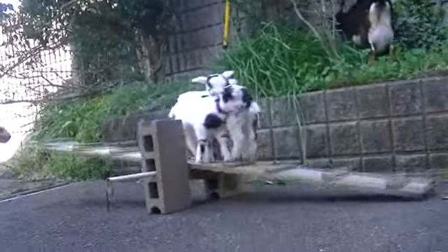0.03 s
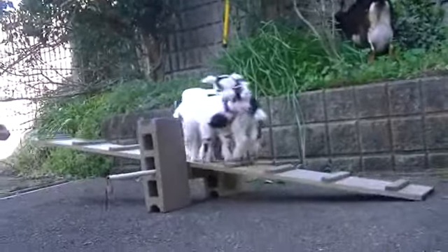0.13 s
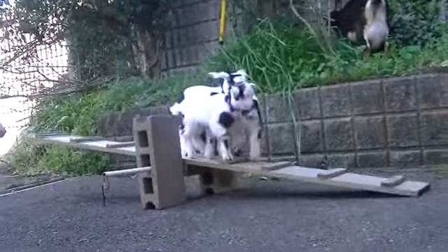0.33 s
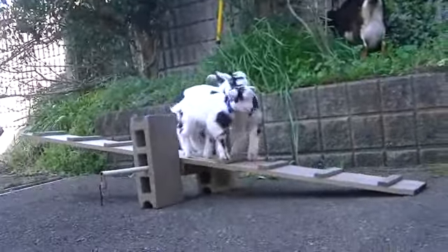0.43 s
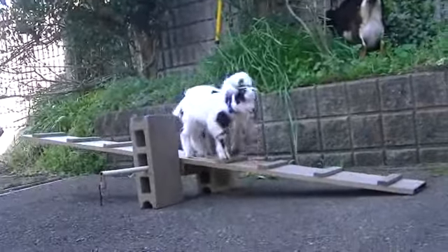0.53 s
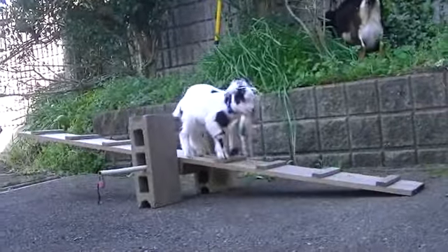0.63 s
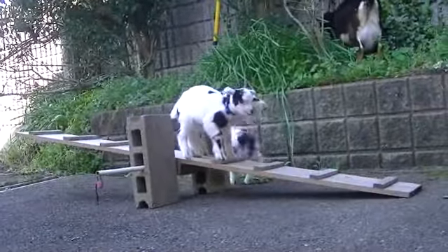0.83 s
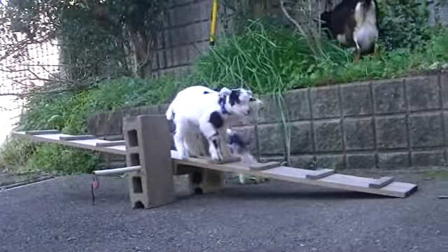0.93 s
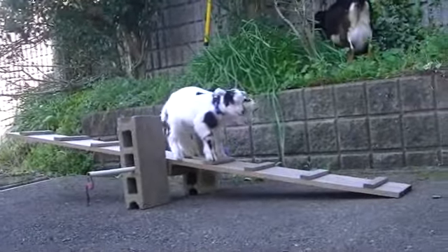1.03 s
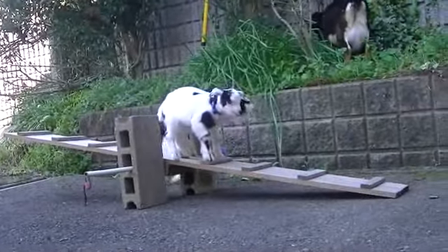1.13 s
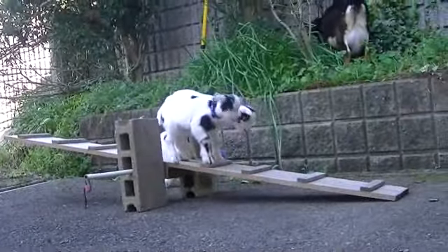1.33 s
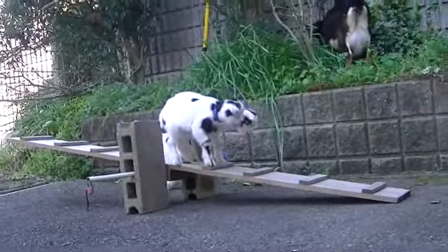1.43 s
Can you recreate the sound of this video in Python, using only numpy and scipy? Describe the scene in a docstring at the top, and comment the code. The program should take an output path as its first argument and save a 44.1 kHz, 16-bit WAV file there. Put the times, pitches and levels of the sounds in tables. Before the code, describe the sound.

A wooden plank seesaw slams onto asphalt at about 0.2 seconds with a loud, briefly ringing clack, rattles, and lands again more softly near 0.6 seconds. Young goats' hooves tick and scuff on the boards through the first second, echoing slightly off the yard's walls. Around 1.1 seconds a few dry bumps sound close on the microphone, fading by 1.4. A faint high whine pulses over quiet outdoor air.

```python
"""A walled yard, where young goats tip a plank seesaw: its end slams on the asphalt, rebounds and
lands again, each contact a woody clack with a short ring. Hooves knock, tick and scuff on the
boards, and the walls answer. Close by, the camera's case takes a few dry bumps, and a faint high
whine pulses over the quiet outdoor air."""
import sys
import numpy as np
from scipy import signal
from scipy.fft import rfft, irfft, next_fast_len
from scipy.io import wavfile
from scipy.ndimage import uniform_filter1d

SR = 44100
rng = np.random.default_rng(int(sys.argv[2]) if len(sys.argv) > 2 else 0)


def store_wav(level_fs):
    """Save 16-bit WAV to argv[1]."""
    pcm = np.round(np.clip(np.atleast_2d(level_fs), -1, 1) * 32767)
    wavfile.write(sys.argv[1], SR, pcm.T.astype(np.int16))


N = 66150

# Stereo width of diffuse sound: frequency_hz, side_over_mid_db
DIFFUSE_WIDTH = [(100, 0.5), (300, -6.5), (600, -3.5), (1200, 0), (2800, -0.5), (3600, 3), (5000, -40.5)]
# Reverb time of the yard: frequency_hz, t60_s
YARD_DECAY = [(150, 0.84), (700, 0.6), (2000, 0.45), (5000, 0.53), (11000, 0.3)]
# Tone colour of the outdoor air: frequency_hz, relative_db
AIR_SPECTRUM = [(18, -39), (30, -28), (187, -2), (665, -1.5), (1160, -2), (1430, -2.5), (1790, -4.5),
                (2760, -9), (4590, -14), (11200, -23.5), (13000, -30)]
# The whine's two tones: pitch_hz, level_db
WHINE_TONES = [(2720, -61.5), (2799, -72.5)]
# Bumps on the camera's case: start_s, level_db, lowpass_hz
CASE_BUMPS = [(0.018, -40, 303), (1.084, -27.5, 3000), (1.094, -27.5, 5060), (1.097, -25, 3000),
              (1.109, -32.5, 900), (1.134, -41.5, 3970), (1.201, -45.5, 690), (1.276, -45.5, 705),
              (1.286, -43, 600), (1.430, -52, 5000)]
# Tone colour of the case: frequency_hz, relative_db
CASE_SPECTRUM = [(40, -34), (130, -10.5), (300, -17), (520, -7.5), (1000, -1.5), (1350, -21.5), (1950, -3),
                 (2250, -12.5), (3600, -7), (5000, -15.5), (11000, -11.5)]
# Stereo width of the bumps: frequency_hz, side_over_mid_db
CASE_WIDTH = [(100, 6), (500, 12), (1000, 7), (2000, 1), (3500, -26.5)]
# Sharp ticks of hoof and grit: start_s, level_db
HOOF_TICKS = [(0.021, -40.5), (0.117, -43.5), (0.124, -55), (0.2008, -27.5), (0.275, -43.5), (0.360, -34),
              (0.370, -27.5), (0.373, -37), (0.47, -43), (0.478, -40), (0.5673, -27), (0.579, -30),
              (0.667, -42.5), (0.7482, -31), (0.81, -45), (0.838, -40.5), (0.901, -56), (1.001, -52)]
# Hooves sliding on the board: peak_s, level_db, half_length_s
HOOF_SCUFFS = [(0.005, -50.5, 0.019), (0.127, -55, 0.026), (0.37, -35, 0.015), (0.331, -50.5, .025),
               (0.495, -51, 0.039), (0.584, -42.5, 0.016), (0.75, -56, 0.056), (0.98, -57, 0.0084)]
# Tone colour of ticks and scuffs: frequency_hz, relative_db
GRIT_SPECTRUM = [(300, -27), (1500, 2), (3000, 1), (5000, -6), (8000, -3.5), (11000, -2), (13000, -14)]
# The plank meeting the ground or a hoof: start_s, level_db, lowpass_hz
PLANK_HITS = [(0.000, -35.5, 940), (0.018, -41.5, 3520), (0.203, -8, 1800), (0.214, -11, 1660),
              (0.23, -21, 1500), (0.275, -20.5, 4540), (0.296, -18.5, 3230), (0.324, -35, 4000),
              (0.412, -34.5, 1000), (0.437, -31.5, 2200), (0.497, -30.5, 2574), (0.574, -14.5, 1350),
              (0.602, -19, 1330), (0.749, -39, 1990), (0.810, -33, 3250), (0.835, -39, 1100),
              (0.974, -44.5, 1300), (1.370, -69, 1400)]
# The plank's ringing modes: pitch_hz, relative_db
PLANK_RING = [(532.9, -43), (635.2, -51.5), (716.0, -42), (748.3, -46.5), (877.5, -50.5), (920.5, -44.5),
              (1023, -40), (1168, -53.5), (1297, -46), (1410, -42), (1486, -46), (1825, -54), (1890, -52.5),
              (1997, -48)]
# Tone colour of the woody clack: frequency_hz, relative_db
WOOD_SPECTRUM = [(60, -54), (150, -36), (250, -17.5), (400, -3), (700, 0), (1400, -2), (1800, -3.5),
                 (2600, -6), (4000, -13.5), (6000, -21), (12000, -18)]

AIR_DB, AIR_WAVER_DB = -56.5, 4.5
WHINE_GAP_AT_S, WHINE_PERIOD_S, WHINE_GAP_S = 1.035, 0.1, 0.025
CASE_ATTACK_S, CASE_T60_S = 0.001, 0.047
TICK_ATTACK_S, TICK_T60_S = 0.0003, 0.025
HIT_ATTACK_S, CLACK_T60_S, CLACK_SIDE_DB = 0.0017, 0.087, -8
RING_DB, RING_T60_S = -7, 0.24
YARD_BUILD_S, HOOF_WET_DB, PLANK_WET_DB = 0.0095, -6.5, -7.5
TOP_HZ = 12800


def amp(db):
    """Decibels to gain."""
    return 10 ** (np.asarray(db) / 20)


def unit_rms(x):
    """Scale to rms 1."""
    return x / np.sqrt(np.mean(x ** 2) + 1e-20)


def curve_at(points, hz):
    """Read a curve of (frequency_hz, value) points on a log frequency axis."""
    point_hz, values = np.transpose(points)
    return np.interp(np.log(hz + 1), np.log(point_hz + 1), values)


def eq(x, response):
    """Filter x with a gain given as a function of frequency."""
    size = next_fast_len(N + SR // 2)
    hz = np.fft.rfftfreq(size, 1 / SR)
    return irfft(rfft(x, size) * response(hz), size)[..., :N]


def lowpass_gain(hz, lowpass_hz):
    """A softer contact loses the treble above its corner."""
    return 1 / np.sqrt(1 + (hz / lowpass_hz) ** 4)


def noise(spectrum, lowpass_hz=SR):
    """Coloured noise of rms 1."""
    white = rng.standard_normal(N)
    return unit_rms(eq(white, lambda hz: amp(curve_at(spectrum, hz)) * lowpass_gain(hz, lowpass_hz)))


def flutter(samples):
    """Random modulation of rms 1, slower when smoothed over more samples."""
    return unit_rms(uniform_filter1d(rng.standard_normal(N), size=samples))


def strike(start_s, attack_s, t60_s):
    """Impact envelope: quick rise, exponential decay."""
    age = np.maximum(np.arange(N) / SR - start_s, 0)
    return (1 - np.exp(-age / attack_s)) * np.exp(-np.log(1000) * age / t60_s)


def spread(mid, side):
    """Left and right of a diffuse sound: wide in the mids, centred in the top end."""
    side = eq(side, lambda hz: amp(curve_at(DIFFUSE_WIDTH, hz)))
    return np.array([mid + side, mid - side])


def yard_reverb(x):
    """The walls' answer builds up, then each frequency dies at its own speed."""
    hz, frame_s, bands = signal.stft(rng.standard_normal((2, SR)), SR, nperseg=256)
    decay = np.exp(-np.log(1000) * frame_s / curve_at(YARD_DECAY, hz)[:, None])
    tail = signal.istft(bands * decay, SR, nperseg=256)[1][:, :SR]
    tail *= 1 - np.exp(-np.arange(SR) / SR / YARD_BUILD_S)
    mid, side = signal.fftconvolve(x[None], tail / np.linalg.norm(tail[0]), axes=1)[:, :N]
    return spread(mid, side)


def outdoor_air():
    """A quiet bed of outdoor noise whose level wavers."""
    level_db = AIR_DB + AIR_WAVER_DB * flutter(samples=3000)
    return amp(level_db) * spread(noise(AIR_SPECTRUM), noise(AIR_SPECTRUM))


def whine():
    """A faint high whine that drops out briefly ten times a second."""
    t = np.arange(N) / SR
    half_period = WHINE_PERIOD_S / 2
    from_gap_s = np.abs((t - WHINE_GAP_AT_S + half_period) % WHINE_PERIOD_S - half_period)
    gate = uniform_filter1d((from_gap_s > WHINE_GAP_S / 2) * 1.0, size=200)  # soft edges
    return gate * sum(amp(db) * np.sqrt(2) * np.sin(2 * np.pi * hz * t) for hz, db in WHINE_TONES)


def case_bumps():
    """Dry knocks through the camera's case push its two microphones in opposite directions."""
    knocks = np.zeros(N)
    for start_s, level_db, lowpass_hz in CASE_BUMPS:
        envelope = strike(start_s, CASE_ATTACK_S, CASE_T60_S)
        knocks += amp(level_db) * envelope * noise(CASE_SPECTRUM, lowpass_hz)
    side = eq(knocks, lambda hz: -1j * amp(curve_at(CASE_WIDTH, hz)))  # a quarter cycle behind
    return np.array([knocks + side, knocks - side])


def hooves():
    """Hoof and grit tick hard on the board and slide in grainy scuffs; the walls answer."""
    t = np.arange(N) / SR
    tick_envelope = sum(amp(db) * strike(start_s, TICK_ATTACK_S, TICK_T60_S) for start_s, db in HOOF_TICKS)
    ticks = tick_envelope * noise(GRIT_SPECTRUM)
    grain = amp(3.1 * flutter(samples=70))
    swells = sum(amp(db) * np.exp(-((t - peak_s) / half_s) ** 2) for peak_s, db, half_s in HOOF_SCUFFS)
    scuffs = swells * unit_rms(grain * noise(GRIT_SPECTRUM))
    return ticks + scuffs + amp(HOOF_WET_DB) * yard_reverb(ticks + scuffs)


def plank():
    """Each hit sets the plank's modes ringing and throws a dense woody clack at the walls."""
    t, out = np.arange(N) / SR, np.zeros((2, N))
    mode_hz, mode_db = np.transpose(PLANK_RING)
    for start_s, level_db, lowpass_hz in PLANK_HITS:
        # Every hit rings with a slightly different balance of modes.
        gains = amp(mode_db + rng.normal(0, 1.8, len(mode_hz))) * lowpass_gain(mode_hz, lowpass_hz)
        modes = np.sin(2 * np.pi * (mode_hz[:, None] * t + rng.random((len(mode_hz), 1))))
        ring = amp(RING_DB) * unit_rms(gains @ modes) * strike(start_s, HIT_ATTACK_S, RING_T60_S)
        envelope = strike(start_s, HIT_ATTACK_S, CLACK_T60_S)
        clack = envelope * noise(WOOD_SPECTRUM, lowpass_hz)
        side = amp(CLACK_SIDE_DB) * envelope * noise(WOOD_SPECTRUM, lowpass_hz)
        out += amp(level_db) * (spread(clack + ring, side) + amp(PLANK_WET_DB) * yard_reverb(clack))
    return out


def scene():
    """The stereo mix: seesaw and hooves up front, close bumps, whine and air beneath."""
    return plank() + hooves() + case_bumps() + whine() + outdoor_air()


def record(dry):
    """A brick-wall high cut on the whole mix."""
    return eq(dry, lambda hz: hz < TOP_HZ)


dry = scene()
out = record(dry)
store_wav(out)
```